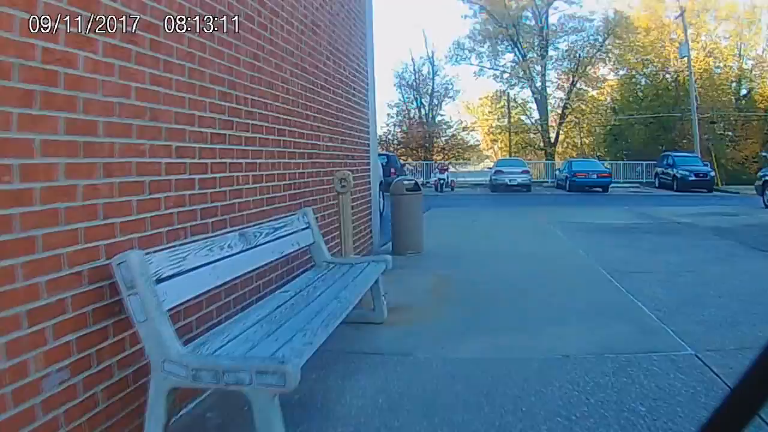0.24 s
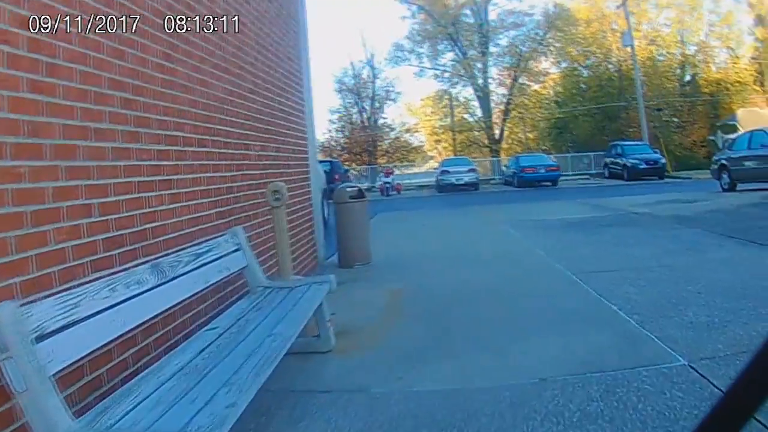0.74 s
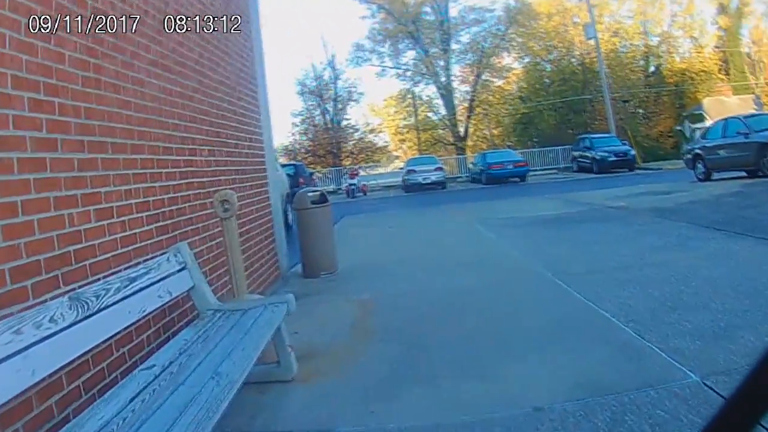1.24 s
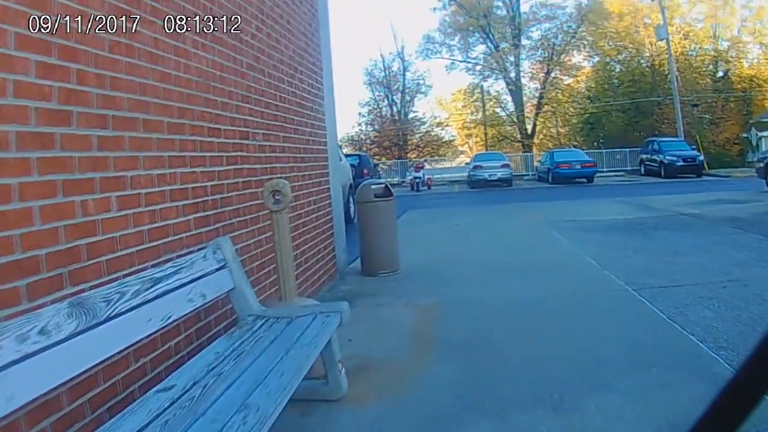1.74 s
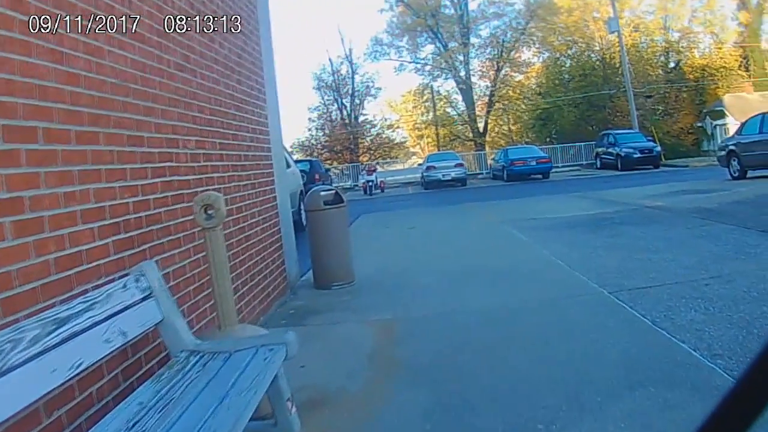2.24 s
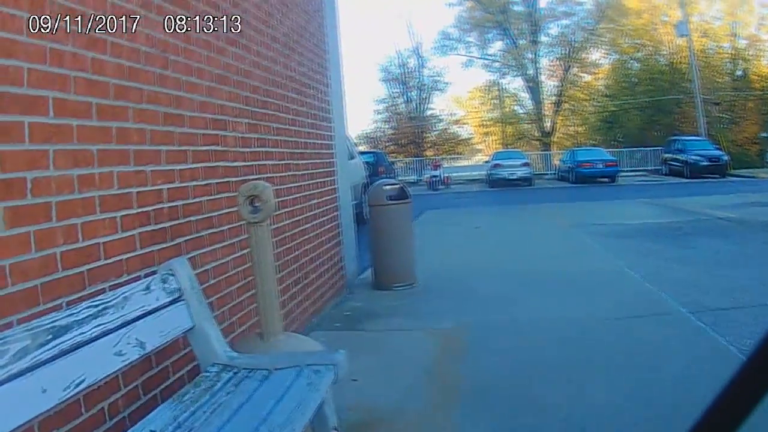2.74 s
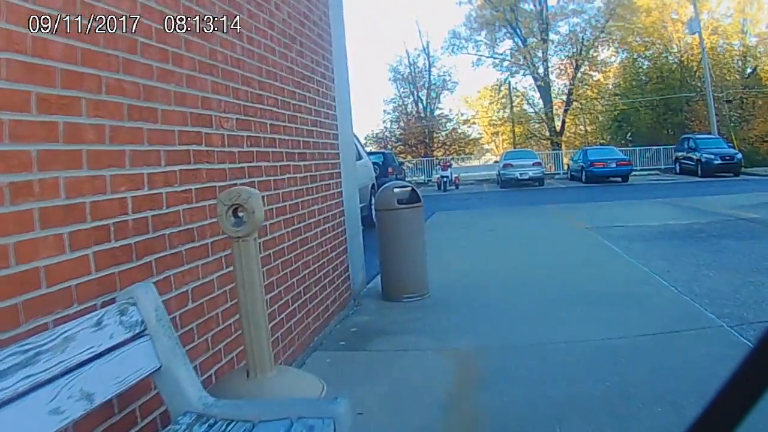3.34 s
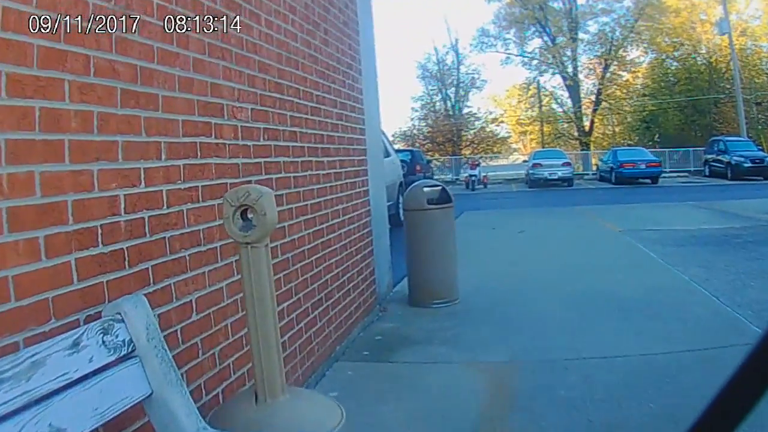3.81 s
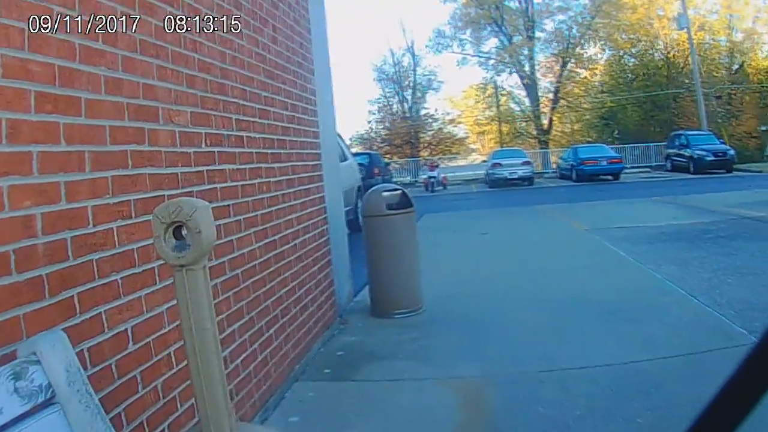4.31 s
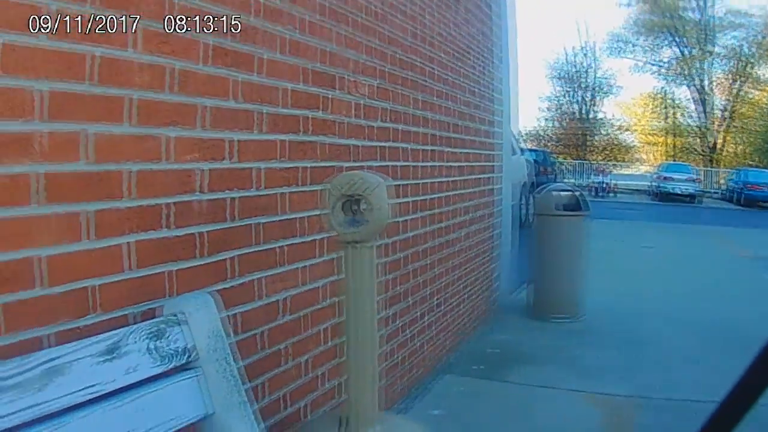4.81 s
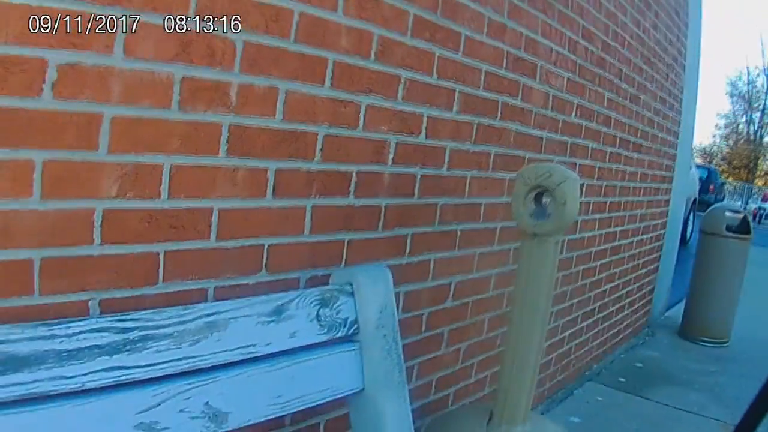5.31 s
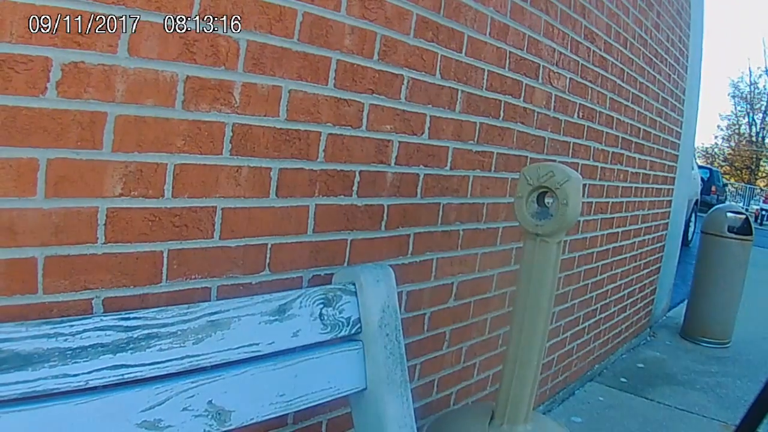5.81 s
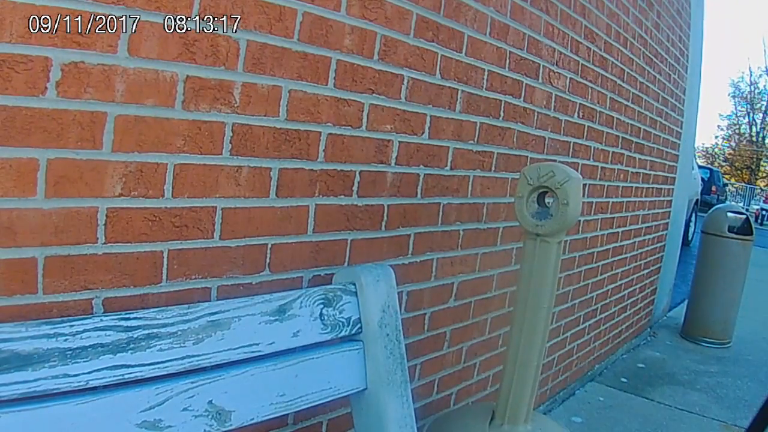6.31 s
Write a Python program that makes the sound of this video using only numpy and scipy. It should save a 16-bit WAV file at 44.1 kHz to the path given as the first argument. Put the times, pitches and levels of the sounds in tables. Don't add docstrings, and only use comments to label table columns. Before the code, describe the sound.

The sound is close, muffled and boxy, carried by a bicycle mount into a plastic camera case, over deep sway, soft tyre rumble and faint electronic hiss, whine and buzz. It opens with clacks, rubbing and a ringing frame bump at 0.15 s. Low snapping thumps with small ticks come from 0.2 to 1.3 s, with a metallic knock at 1.07 and tiny squeaks near 1.4. A dull bump rings at 1.9; a dense cluster of bumps follows from 2.2 to 2.8. Scattered raps and clacks continue from 3.1 to 4.7. Rasping stick-slip chatter at 4.8-5.0 ends in a hard rap, with another knock at 5.18. From 5.32 to 5.54 a violent shake distorts and crackles with gritty bursts. Heavy low jolts follow until 6.0, then handled-case taps, the sharpest at 6.3, fading into quieter rumble.

```python
import sys
import numpy as np
from scipy import signal
from scipy.fft import rfft, irfft
from scipy.io import wavfile
from scipy.ndimage import uniform_filter1d

SR = 44100
rng = np.random.default_rng(int(sys.argv[2]) if len(sys.argv) > 2 else 0)


def store_pcm(level_fs):
    pcm = np.round(np.clip(level_fs, -1, 1) * 32767).astype(np.int16)
    wavfile.write(sys.argv[1], SR, np.atleast_2d(pcm).T)


def ratio_of_db(decibels):
    return 10 ** (np.asarray(decibels, float) / 20)


N = 288839


def evened(x):
    return x / np.sqrt(np.mean(x ** 2) + 1e-20)


def add(mix, s, sound):
    part = mix[max(round(s * SR), 0):][:len(sound)]
    part += sound[:len(part)]


def ring(x, modes, tilt_db=0.):
    out = np.zeros(len(x))
    for k, (hz, width, db) in enumerate(modes):
        pole = np.exp((2j * np.pi * hz - np.pi * abs(width)) / SR)
        gain = (-1) ** k * ratio_of_db(db + tilt_db * np.log2(hz / 1500)) * (1 - abs(pole))
        out += gain * signal.lfilter([1j], [1, -pole], x).real
    return out


def step(t, rise_ms):
    u = np.maximum(t, 0) * 1000 / max(rise_ms, .01)
    return 1 - (1 + u) * np.exp(-u)


def leaked(change, leak_s):
    return signal.lfilter([1], [1, -np.exp(-1 / (leak_s * SR))], change)


# (time [s], sway level [dB], frame rubbing level [dB])
SHAKING = [(0.0, -43.5, -41.5), (0.5, -38.5, -51.5), (1.28, -37, -53), (1.42, -40.5, -51),
           (1.84, -36, -54.5), (2.22, -43.5, -49.5), (2.42, -36, -40.5), (2.65, -39.5, -52),
           (3.47, -40, -57.5), (4.21, -46, -61), (4.7, -53, -53), (4.9, -48, -38), (5.25, -48.5, -49),
           (5.379, -31, -42), (5.58, -40, -53.5), (5.82, -42, -57), (6.1, -46.5, -65.5),
           (6.55, -47.5, -54.5)]


def shaking():
    s, sway_db, rub_db = np.transpose(SHAKING)
    t = np.arange(N) / SR
    return np.interp(t, s, sway_db), np.interp(t, s, rub_db)


# (frequency [Hz], width [Hz], level [dB])
MOUNT_MODES = [(33, 15, 4.5), (55, 17, 0)]
# (frequency [Hz], width [Hz], level [dB])
TYRE_MODES = [(66.7, 33.5, 3), (117.8, 23, 4.5), (146.2, 46, -1), (188.5, 52, -2)]


def sway():
    swing = ring(ring(rng.standard_normal(N), MOUNT_MODES), MOUNT_MODES)
    rumble = ring(ring(rng.standard_normal(N), TYRE_MODES), TYRE_MODES)
    sway_db, rub_db = shaking()
    tyre_db = -50.5 + 0.97 * (sway_db + 40.0) + 0.72 * (rub_db + 49.0)
    return ratio_of_db(sway_db) * evened(swing) + ratio_of_db(tyre_db) * evened(rumble)


def rubbing(modes, per_s, spread_db, smooth_hz, tilt_db, patchy_db):
    loudness = ratio_of_db(spread_db * np.minimum(rng.exponential(1, N), 4))
    slips = (rng.random(N) < per_s / SR) * rng.standard_normal(N) * loudness
    soft = signal.sosfilt(signal.butter(2, smooth_hz, fs=SR, output="sos"), slips)
    hop = 3000
    wander = patchy_db * rng.standard_normal((len(modes), N // hop + 2))
    out = np.zeros(N)
    for k, (mode, turns) in enumerate(zip(modes, wander)):
        gain = ratio_of_db(np.interp(np.arange(N) / hop, np.arange(len(turns)), turns))
        out += (-1) ** k * gain * ring(soft, [mode], tilt_db)
    return evened(out)


# (frequency [Hz], width [Hz], level [dB])
FRAME_MODES = [(188, 3, -36), (255.9, 17.4, -2.5), (291.5, 35.4, 1.5), (300.1, 13.1, 7), (370.2, 8.4, -5),
               (435.8, 5, -7), (467.2, 7.8, -4.5), (519, 27.4, -11.5), (642, 53, -23.5), (734.5, 8.8, -17),
               (900, 34, -33), (982, 12.6, -22.5), (1115, 77, -37.5)]


def frame_rubbing():
    rub = rubbing(FRAME_MODES, per_s=1100.0, spread_db=-4.5, smooth_hz=910.0, tilt_db=3.0, patchy_db=3.0)
    return ratio_of_db(shaking()[1]) * rub


def stroking(strokes, rest_db):
    grip_s, release_db_per_s = 0.035, 279.5
    power, t = np.full(N, ratio_of_db(2 * rest_db)), np.arange(SR) / SR
    for s, hold, db in strokes:
        fade_db = release_db_per_s * np.maximum(t - grip_s - hold, 0)
        add(power, s, (np.minimum(t / grip_s, 1) * ratio_of_db(db - fade_db)) ** 2)
    return np.sqrt(power)


# (frequency [Hz], width [Hz], level [dB])
CASE_MODES = [(905, 84, 6.5), (1220, 100, 9.5), (1503, 130, 8.5), (1805, 61, 9.5), (2010, 140, 2.5),
              (2228, 96, -1.5), (2540, 146, -10.5), (3405, 225, -11), (4250, 140, -19), (5170, 180, -24),
              (6000, 200, -26)]
# (start [s], hold [s], level [dB])
CASE_STROKES = [(0, 0.074, -53), (0.112, 0.057, -58.5), (.45, 0.076, -65.5), (0.615, 0.048, -60.5),
                (.7, 0.12, -67.5), (0.91, 0.18, -69.5), (1.39, 0.55, -74), (1.868, 0.045, -61.5),
                (1.967, 0.1, -68), (2.224, 0.24, -60), (2.407, 0.14, -59.5), (2.563, 0.04, -65),
                (2.7, 0.16, -66), (3.231, 0.09, -59.5), (3.413, 0.26, -66), (3.675, 0.1, -66.5),
                (3.75, 0.054, -63), (4.02, 0.026, -62), (4.137, 0.36, -75), (4.393, 0.052, -65.5),
                (4.645, 0.23, -62.5), (4.78, 0.21, -56), (5.0, 0.1, -68), (5.173, 0.034, -55),
                (5.263, 0.24, -60.5), (6.3, 0.19, -63)]


def case_rubbing():
    rub = rubbing(CASE_MODES, per_s=2400.0, spread_db=-1.0, smooth_hz=6900.0, tilt_db=1.0, patchy_db=2.2)
    return stroking(CASE_STROKES, rest_db=-78) * rub


# (frequency [Hz], width [Hz], level [dB])
COVER_MODES = [(3350, 53, 7.5), (5050, 260, -0.5), (5870, 120, -10)]
# (start [s], hold [s], level [dB])
COVER_STROKES = [
    (0, 0.13, -75.5),
    (1.9, 0.092, -84),
    (2.23, 0.13, -83),
    (2.39, 0.15, -77),
    (3.23, 0.075, -78),
    (3.67, 0.069, -79),
    (4.82, .12, -98),
    (6.31, .2, -82.5),
    (5.46, .07, -73.5),
]


def cover_singing():
    rub = rubbing(COVER_MODES, per_s=3000.0, spread_db=2.0, smooth_hz=9000., tilt_db=5.0, patchy_db=2.5)
    return stroking(COVER_STROKES, rest_db=-100) * rub


# (time [s], frequency [Hz], level [dB], t60 [s])
PINGS = [(0, 635, -56, 2), (0.149, 464, -69, 1.2), (0.148, 307, -62, 0.57), (1.073, 306.6, -36, 0.51),
         (1.6, 133, -45, 0.28), (1.904, 114.5, -42.5, 0.37), (1.905, 260.7, -36.5, 0.93),
         (1.905, 506, -64, .2), (1.919, 441, -58, 0.91), (2, 167, -47, 0.38), (2.395, 117, -39, 0.39),
         (2.4, 732, -69, 1.6), (2.401, 235.7, -33.5, .4), (2.689, 300, -63, 0.74), (2.69, 356, -60, 0.88),
         (2.701, 487, -47.5, 1.2), (3.611, 113.5, -45, 0.37), (3.62, 174, -52, 0.37),
         (3.969, 95, -41, 0.22), (4.441, 305, -49, 0.61), (4.806, 306.5, -31.5, 0.46),
         (4.999, 385, -54, 0.66), (5.178, 470, -46, 0.57), (6.31, 199, -54, 2.2), (0.072, 287.2, -32, 0.47),
         (2.589, 32.4, -33, 0.46), (5.72, 27.2, -30, 0.48), (5.857, 25.8, -20.5, 0.095),
         (5.94, 34, -35.5, 0.68), (6.124, 34.6, -38, 0.55), (2.395, 966, -35.5, 0.075),
         (2.395, 747, -56, .2), (4.0, 616, -56.5, 0.19), (4.799, 143, -48, 0.25), (5.181, 1260, -29, 0.033),
         (6.31, 624, -53, 0.16), (5.179, 2140, -40.5, 0.066), (5.18, 5030, -56, 0.051),
         (5.199, 3180, -66, 0.11), (5.662, 2150, -60, 0.091), (2.694, 1180, -50, 0.1),
         (2.69, 518, -48, 0.27), (4.879, 296.5, -25.5, 0.26), (4.823, 309, -28.5, 0.18),
         (4.92, 311, -29, 0.14), (4.798, 1470, -46, .05), (5.18, 872, -44, 0.13), (6.33, 380, -41, 0.17),
         (2.45, 255.5, -31, 0.28), (4.63, 632, -49, .2),
         (.151, 466, -35, .1), (1.072, 470, -27.5, 0.087), (1.072, 936, -39, .05),
              (1.072, 1260, -47, 0.055), (1.905, 470, -37, 0.089), (2.394, 1250, -44, 0.052),
              (2.24, 2140, -47.5, 0.047), (4.874, 1443, -38, 0.067), (4.889, 1430, -38, .06),
              (4.889, 1750, -34, 0.046), (5.003, 1545, -27, .045), (5.003, 1707, -28, .04),
              (5.002, 743, -40, .075), (5.002, 2050, -36, .04), (5.19, 388, -33, .2),
              (5.2, 2019, -66, 0.34), (6.232, 1500, -49, .03), (1.213, 1840, -54.5, 0.037)]


def pings():
    out, t = np.zeros(N), np.arange(SR) / SR
    rise_s = 0.0018
    for s, hz, db, t60 in PINGS:
        fade = ratio_of_db(db - 60 * t / max(t60, .02)) * np.tanh(t / rise_s) * (1 - t)
        add(out, s, fade * np.sin(2 * np.pi * hz * t))
    return out


# (frequency [Hz], level [dB per Hz])
HISS_CURVE = [(300, -37), (1000, -11), (2500, -15.5), (4150, -15.5), (7000, -20), (9500, -20), (11200, -15),
              (12500, -19), (14500, -17.5), (15500, -15.5)]


def hiss():
    hz = np.fft.rfftfreq(N, 1 / SR)
    f, db = np.transpose(HISS_CURVE)
    curve = ratio_of_db(np.interp(np.log(hz + 1), np.log(f), db))
    return ratio_of_db(-72.5) * evened(irfft(rfft(rng.standard_normal(N)) * curve, N))


# (frequency [Hz], level [dB rms])
WHINE_TONES = [(13695, -96), (13749, -85), (13803, -93)]


def whine():
    t = np.arange(N) / SR
    return sum(np.sqrt(2) * ratio_of_db(db) * np.cos(2 * np.pi * f * t) for f, db in WHINE_TONES)


# (time [s], level [dB])
CARD_WRITES = [(0.4589, -59.5), (0.8385, -62), (0.8869, -71), (1.2406, -60), (1.7135, -62), (2.2114, -62),
               (2.611, -62), (3.0395, -63), (3.476, -62), (3.9669, -63), (4.3755, -62), (4.7556, -62),
               (5.2066, -62), (5.656, -61), (6.107, -64), (6.1554, -66)]
# (frequency [Hz], width [Hz], level [dB])
SUPPLY_MODES = [(11100, 1000, -18), (11240, 330, -2), (15600, 400, -12)]


def supply_buzz():
    t = np.arange(N) / SR
    frames_per_s, first_frame_s = 30, .008
    load = ratio_of_db(-74.5) * np.exp(-((t - first_frame_s) * frames_per_s % 1) / 0.12)
    for s, db in CARD_WRITES:
        add(load, s, ratio_of_db(db - 12.5) * signal.windows.tukey(round(0.042 * SR), .3))
    return load * evened(ring(rng.standard_normal(N), SUPPLY_MODES))


def blow(noise, modes, contact_ms, lead, tilt_db=0., scrape_db=3.5):
    ms = np.arange(len(noise)) * 1000 / SR
    fade = ms / max(contact_ms, .1)
    rattle_and_scrape = np.exp(-fade) + ratio_of_db(scrape_db) * np.exp(-fade / 7.8)
    force = noise * rattle_and_scrape * np.tanh(ms / 1.17) / np.sqrt(contact_ms)
    force[:12] += lead * np.hanning(12)
    sound = ring(force, modes, tilt_db) * np.linspace(1, 0, len(noise))
    return sound / np.sqrt(np.mean(sound[:round(40 * contact_ms) + 400] ** 2))


# (time [s], case peak [dB], frame level [dB], contact [ms])
CLACKS = [(0.055, -38.5, -52, 12), (0.5408, -66, -44.5, 9.1), (1.4662, -64, -40, 18),
          (1.614, -47, -46, 1.3), (1.9205, -49, -33.5, 25), (2.4486, -47, -41, 7.5),
          (2.6804, -45.5, -41, 8.3), (3.6968, -40.5, -51, 11), (3.9791, -42, -52, 2.2),
          (4.0089, -39, -46.5, 6.4), (4.0745, -43.5, -41.5, 13), (4.1077, -48, -43.5, 2.4),
          (4.3285, -42, -55, 4.7), (4.4347, -60, -41, 14), (4.7386, -43.5, -41, 7), (5.5904, -47, -70, 1.4),
          (5.8405, -30, -50, 3), (6.2318, -34.5, -68, 3), (6.2387, -37, -44.5, 13),
          (6.3789, -41, -47.5, 0.99), (5.179, -26.5, -29.5, 6.8), (1.5835, -44.5, -70, 2.1),
          (0.002, -39, -40.5, 4.8), (0.9, -69, -59, 6.1), (3.862, -64, -46, 8.2)]
# (time [s], case peak [dB], frame level [dB], contact [ms])
BUMPS = [(0.1505, -48, -26, 3.4), (0.1682, -41, -51, 1), (0.2314, -42, -52, 5.4), (0.4517, -43, -49, 6.2),
         (0.4813, -45, -39.5, 20), (1.0712, -43, -26.5, 5.1), (1.1542, -46.5, -36, 5.6),
         (1.2137, -56, -46, 4.8), (1.272, -46, -40, 0.58), (1.392, -44.5, -61, 5.9),
         (1.5919, -64, -37, 4.8), (1.701, -40.5, -39, 7.2), (1.9037, -70, -27.5, 19),
         (2.0404, -64, -37, 14), (2.2406, -33.5, -36, 10), (2.2829, -37, -40.5, 10.5),
         (2.3226, -40, -37, 5), (2.361, -33, -41, 7), (2.3927, -39, -21.5, 1.2), (2.4185, -31, -40, 12),
         (2.6885, -55, -23.5, 7), (2.7806, -28, -33.5, 3.8), (3.1239, -43, -41.5, 19),
         (4.5782, -31.5, -40, 6.3), (4.8225, -56, -38.5, 3.1), (5.3195, -39, -54, 1.3),
         (5.411, -40, -54, 7), (0.072, -53, -44, 6.6), (3.312, -46, -43.5, 27)]
# (time [s], case peak [dB], frame level [dB], contact [ms])
RAPS = [(1.4865, -34.5, -68, 2.2), (2.8141, -41, -36.5, 13), (3.0704, -49, -73, 23),
        (3.6031, -31.5, -34.5, 6.7), (3.786, -43, -46, 9.3), (3.8322, -33.5, -34.5, 4.8),
        (4.4793, -38.5, -42.5, 1.6), (4.6237, -34.5, -33.5, 4.6), (5.0019, -20, -32.5, 4),
        (5.664, -50, -52, 4.6), (6.304, -15.5, -33, 1.3), (6.4425, -46, -49.5, 0.7)]
# (time [s], peak [dB])
CHATTER = [(4.796, -37.5), (4.824, -51), (4.845, -46), (4.861, -36.5), (4.872, -32), (4.8891, -26),
           (4.902, -33), (4.9194, -38), (4.9305, -39.5), (4.939, -37.5), (4.961, -41), (4.975, -43)]
# (frequency [Hz], width [Hz], level [dB])
HELD_FRAME_MODES = [(199, 11.6, -7.5), (279, 11, -7), (380, 8.8, 0.5), (470, 12, -7), (624, 25, -10),
                    (725, 28, -20), (990, 57, -19)]
# (frequency [Hz], width [Hz], level [dB])
HELD_CASE_MODES = [(1084, 25, 5.5), (1400, 84, 3.5), (1600, 84, -0.5), (1750, 39, 2), (1900, 110, 0),
                   (2580, 100, -10), (2930, 70, -12), (3360, 110, -10), (4260, 87, -28), (4880, 110, -20),
                   (6220, 89, -24)]


def knocks():
    out = np.zeros(N)
    held_from_s = 6.1
    chatter = [(s, db + 4.5, -90, 1.3) for s, db in CHATTER]
    # brightness in dB per octave, case tone nearest the blow in Hz
    kinds = [(BUMPS, (-4.5, 970)), (CLACKS, (4.5, 1548)), (RAPS, (-.4, 1754)), (chatter, (-1, 1480))]
    blows = [(*row, *spot) for rows, spot in kinds for row in rows]
    rattle = rng.standard_normal((len(blows), 2, 5000))
    spots_db = 2.5 * rng.standard_normal((len(blows), len(FRAME_MODES)))
    rubber = signal.butter(2, 1300., fs=SR, output="sos")
    first_push = 6.5
    for (s, case_db, frame_db, ms, tilt_db, near_hz), (a, b), spot_db in zip(blows, rattle, spots_db):
        held = s > held_from_s
        case = []
        for hz, width, db in HELD_CASE_MODES if held else CASE_MODES:
            near_db = 8.4 * np.exp(-(np.log2(hz / near_hz) / 0.059) ** 2)
            case.append((hz, 1.18 * width, db + near_db))
        body = HELD_FRAME_MODES if held else FRAME_MODES
        frame = [(hz, 1.29 * width, db + d) for (hz, width, db), d in zip(body, spot_db)]
        hard_db = 3.5 + 0.038 * (frame_db + 3.5)
        on_case = blow(a, case, 0.31 * ms, 1.0, tilt_db)
        on_frame = blow(b, frame, .65 * ms, first_push, hard_db, scrape_db=-0.5)
        tyre_thud = blow(a, TYRE_MODES, ms, first_push)
        add(out, s, ratio_of_db(case_db - 16.0) * on_case)
        add(out, s, ratio_of_db(frame_db - 6.0) * signal.sosfilt(rubber, on_frame))
        add(out, s, ratio_of_db(frame_db - 26.5) * signal.sosfilt(rubber, tyre_thud))
    return out


LEAN_S = .0125
LEAK_S = .016


def jolt(t, rise_ms, lean, rebound_ms):
    damping = .74
    u = np.pi * np.maximum(t - LEAN_S, 0) * 1000 / rise_ms
    snap = 1 - np.exp(-damping * u) * (np.cos(u) + damping * np.sin(u))
    catch = .28 * min(1, 1.5 / rise_ms) ** 3
    caught = step(t - LEAN_S + .0005, .067)
    eased = np.exp(-rebound_ms / 4.6) * step(t - LEAN_S + .0051, 1.45)
    leaning = step(t, 3.7) - eased
    back = .73 * step(t - LEAN_S - rise_ms / 1000, rebound_ms)
    return (1 + catch) * snap - catch * caught - lean * leaning - back


# (time [s], jump [dB], rise [ms], lean [share of the jump], rebound [ms])
JOLTS = [(0.2324, -20.4, 6.37, 0.95, 12.3), (0.2687, -18.6, 4.02, 0.9, 9.6),
         (0.6694, -17.4, 1.42, 0.83, 13.6), (0.7598, -13.8, 1.67, 0.8, 6.4),
         (0.7911, -17.1, 1.47, 0.83, 9.4), (0.8416, -22.3, 2.19, 0.66, 10.1),
         (0.8691, -20.0, 5.66, 0.95, 19.4), (1.18, -17.0, 1.35, 0.84, 11.0),
         (1.2445, -18.6, 5.28, 1.41, 1.2), (1.2992, -18.8, 1.45, 0.74, 6.6),
         (1.3285, -22.5, 1.69, 0.8, 12.7), (2.3253, -28.2, 1.82, 0.98, 20.0),
         (2.3569, -28.3, 1.53, 1.18, 20.0), (2.4381, -27.3, 1.5, 0.82, 20.0),
         (2.5874, -27.2, 2.6, 0.95, 20.0), (2.6186, -23.8, 2.6, 1.06, 20.0),
         (2.737, -23.1, 1.83, 1.05, 20.0), (3.1934, -21.9, 2.27, 0.91, 20.0),
         (5.6243, -20.6, 7.35, 0.82, 15.4), (5.6523, -20.1, 4.45, 1.22, 3.6),
         (5.7629, -15.3, 1.86, 0.7, 2.2), (5.805, -14.9, 2.48, 0.83, 8.2), (5.8359, -17.1, 1.69, 0.82, 4.7),
         (5.8944, -11.4, 1.65, 0.85, 3.1), (5.9239, -16.9, 1.96, 1.09, 3.0),
         (6.003, -21.2, 2.57, 0.82, 8.2)]


def jolts():
    change, t = np.zeros(N), np.arange(8000) / SR
    for s, db, *shape in JOLTS:
        add(change, s - LEAN_S, ratio_of_db(db) * np.diff(jolt(t, *shape), prepend=0))
    return leaked(change + ratio_of_db(-8) * ring(change, FRAME_MODES, 6.4), LEAK_S)


# (start [s], end [s])
OVERLOAD = (5.322, 5.54)


def free():
    held = np.zeros(N)
    for s, *_ in JOLTS:
        add(held, s - .025, 0.65 * np.hanning(round(.055 * SR)))
    start_s, end_s = OVERLOAD
    add(held, start_s, .9 * signal.windows.tukey(round((end_s - start_s) * SR), .05))
    return 1 - np.minimum(held, .9)


# (time [s], peak [dB], rise [ms])
TICKS = [(0.2691, -35.5, 0.13), (0.669, -51, 0.11), (0.683, -41, 0.041), (0.7595, -46, 0.036),
         (0.7735, -32.5, 0.12), (0.7907, -53, 0.07), (0.8073, -41, 0.065), (0.8419, -38, 0.11),
         (0.8694, -43, 0.2), (0.899, -54, .15), (1.1802, -38.5, 0.058), (1.1984, -44, 0.031),
         (1.247, -27.5, 0.19), (1.272, -38, 0.09), (1.283, -41.5, 0.041), (1.3275, -41, 0.13),
         (2.5881, -44, 0.14), (2.681, -48, 0.0097), (3.193, -31, 0.19), (5.3347, -31, 0.06),
         (5.3268, -36, 0.025), (5.428, -44, 0.06), (5.4646, -37, 0.027), (5.4936, -35.5, 0.033),
         (5.5307, -40, 0.032), (5.652, -39.5, 0.16), (5.7624, -45, 0.021), (5.803, -38.5, 0.091),
         (5.8347, -54, 0.09), (5.894, -51, 0.12), (5.902, -34, 0.1), (5.9235, -30, 0.15),
         (6.0035, -38, 0.14)]


def ticks():
    change, t = np.zeros(N), np.arange(8000) / SR
    lead_s = .0006
    for s, db, rise_ms in TICKS:
        edge = step(t - lead_s, rise_ms) - step(t, 0.38)
        add(change, s - lead_s, ratio_of_db(db + 5.5) * np.diff(edge, prepend=0))
    return leaked(change, LEAK_S)


# (time [s], level [dB])
SQUEAKS = [
    (1.1114, -82),
    (1.3844, -75),
    (1.4544, -78),
    (1.478, -68.5),
    (2.4132, -66.5),
    (3.2796, -86),
]


def squeaks():
    out = np.zeros(N)
    for s, db in SQUEAKS:
        tone = evened(ring(rng.standard_normal(800), [(3310.0, 76.0, 0)]))
        add(out, s, ratio_of_db(db + 6.0) * tone * np.hanning(800))
    return out


# (time [s], place reached [share of the rail], rise [ms])
SLAMS = [(5.312, .2, 2), (5.3188, -.15, .3), (5.3199, .05, .15), (5.3208, -.95, .45), (5.3271, 1.0, .3),
         (5.3289, .6, .25), (5.33, .88, .3), (5.3413, -.2, .08), (5.3417, -1.0, .085), (5.3543, .7, .4),
         (5.3562, -.25, .4), (5.3602, .05, .08), (5.3606, -.25, .08), (5.3611, 1.0, .05), (5.3702, -.1, .7),
         (5.377, .2, .5), (5.3825, -1.0, .08), (5.3918, .25, .6), (5.3943, 1.0, .1), (5.4005, .2, .5),
         (5.404, -.2, 1.5), (5.4105, -.4, .4), (5.4125, -.9, .4), (5.4206, 1.0, .06), (5.4222, .3, .2),
         (5.4232, .85, .2), (5.4278, .3, .5), (5.4377, -1.0, .085), (5.4452, -.2, .4), (5.4478, -.45, .3),
         (5.454, 1.0, .052), (5.466, .12, .6), (5.472, -1.0, .078), (5.479, -.2, .7), (5.4825, -.45, .7),
         (5.4862, .5, 1.3), (5.49, 1.15, .9), (5.498, -.1, .8), (5.501, -.35, 1.3), (5.5066, .05, 1.7),
         (5.521, -.9, 1.6), (5.5275, -.3, .8), (5.531, .95, .35), (5.534, .1, 2.2), (5.54, -.2, 2),
         (5.548, .05, 2)]


def slams():
    change, t = np.zeros(N), np.arange(8000) / SR
    rail, leak_s = .25, .0125
    last_s, last_place = 0, 0
    for s, place, rise_ms in SLAMS:
        remaining = last_place * np.exp((last_s - s) / leak_s)
        add(change, s, rail * (place - remaining) * np.diff(step(t, rise_ms), prepend=0))
        last_s, last_place = s, place
    return leaked(change, leak_s)


def unpinned():
    pinned = np.zeros(N)
    for (s, place, _), (until, *_) in zip(SLAMS, SLAMS[1:]):
        pinned[round(s * SR):round(until * SR)] = abs(place) > .84
    return 1 - .93 * uniform_filter1d(pinned, size=30)


# (time [s], length [ms], level [dB])
GRIT = [(5.3192, 2.1, -42.5), (5.354, 1.5, -50), (5.3597, 0.88, -47), (5.372, 6.1, -49), (5.3917, 2.5, -48),
        (5.408, 4.6, -42), (5.422, 3, -49), (5.4305, 1.3, -56), (5.444, 4.9, -56), (5.4925, 1.9, -56),
        (5.506, 12, -55)]


def grit():
    out = np.zeros(N)
    dull = signal.butter(2, [900., 4500.], "bandpass", fs=SR, output="sos")
    for s, ms, db in GRIT:
        fade = np.exp(-(np.arange(900) * 1000 / SR / max(ms, .3)) ** 4)
        burst = rng.standard_normal(900) * fade
        rough = signal.sosfilt(dull, burst) / max(ms, 1)
        add(out, s, ratio_of_db(db - 0.5) * (rough + 3.0 * ring(burst, CASE_MODES, 2.2)))
    return out


# (time [s], peak [dB])
CRACKS = [
    (5.3417, -40),
    (5.4541, -46),
    (5.4202, -51),
    (5.4374, -36),
]


def crackle():
    out = np.zeros(N)
    for s, db in CRACKS:
        burst = rng.standard_normal(24) * np.hanning(24)
        add(out, s, ratio_of_db(db) * evened(ring(burst, [(11000.0, 1800.0, 0)])))
    return out


def scene():
    through_mount = frame_rubbing() + case_rubbing() + knocks() + pings()
    shaken = free() * sway() + unpinned() * through_mount
    pressure = jolts() + ticks() + slams()
    electronics = hiss() + whine() + supply_buzz()
    small_parts = cover_singing() + squeaks() + grit() + crackle()
    return (shaken + pressure + electronics + small_parts)[None]


def roll_off(x):
    return signal.sosfilt(signal.butter(12, 16790, fs=SR, output="sos"), x)


def record(dry):
    ceiling, edge_hz = .255, 15830
    clipped = np.clip(dry, -ceiling, ceiling)
    low_pass = signal.firwin(1023, edge_hz, window=("kaiser", 9), fs=SR)
    mix = signal.oaconvolve(clipped, low_pass[None], "same")
    return roll_off(mix)


dry = scene()
out = record(dry)
store_pcm(out)
```